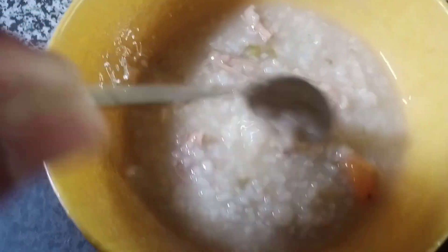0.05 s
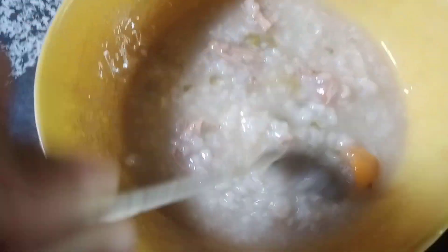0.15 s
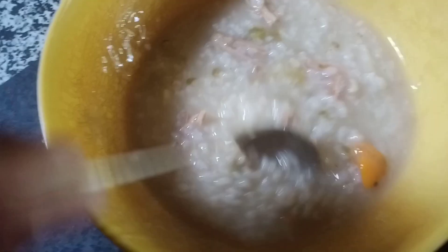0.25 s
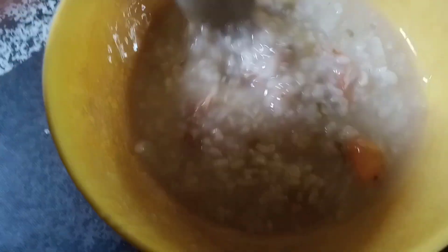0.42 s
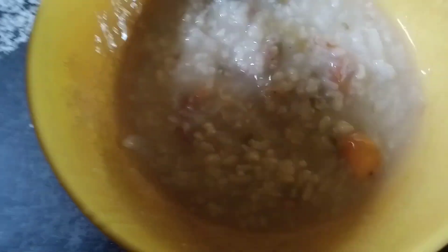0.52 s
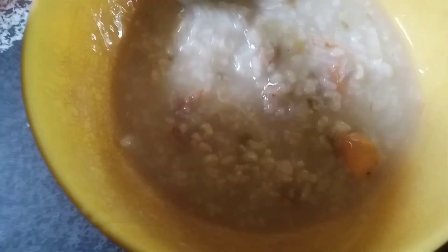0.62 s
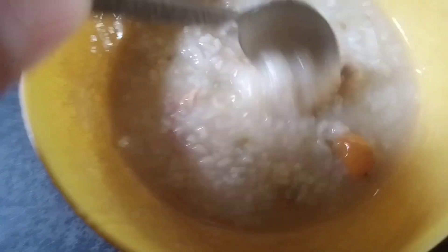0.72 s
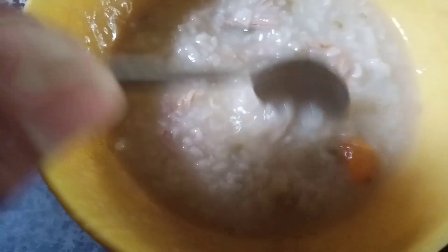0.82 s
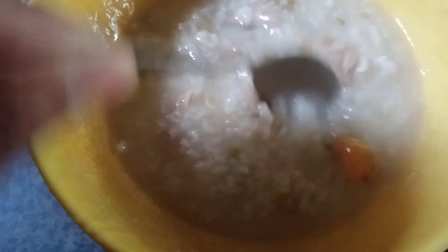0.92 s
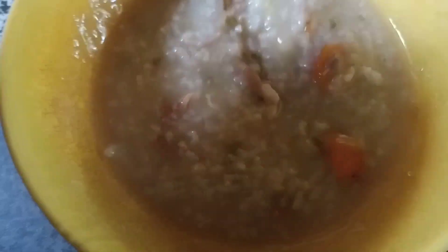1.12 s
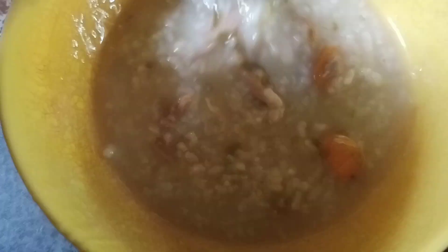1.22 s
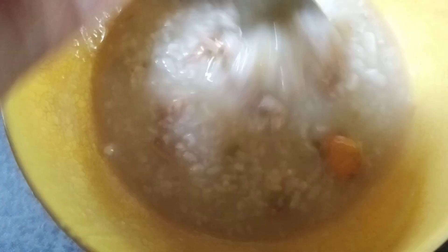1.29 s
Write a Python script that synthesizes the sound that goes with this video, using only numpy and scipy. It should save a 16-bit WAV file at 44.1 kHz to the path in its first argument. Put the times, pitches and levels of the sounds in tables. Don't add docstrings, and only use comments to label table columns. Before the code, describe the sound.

Two short, food-damped spoon knocks on a ceramic bowl about 0.7 seconds apart, each with quick bounces and a brief scrape, faint moist hisses between, steady soft fan noise, small kitchen, close phone pickup.

```python
import sys
import numpy as np
from scipy import signal
from scipy.fft import rfft, irfft
from scipy.io import wavfile
from scipy.ndimage import uniform_filter1d

SR = 44100
rng = np.random.default_rng(int(sys.argv[2]) if len(sys.argv) > 2 else 0)


def digitize_waveform(pressure):
    field = np.atleast_2d(pressure).T
    bounded = np.clip(field, -1, 1)
    quanta = np.round(bounded * 32767).astype(np.int16)
    wavfile.write(sys.argv[1], SR, quanta)


def ratio(d):
    e = np.asarray(d, float) / 20
    return 10 ** e


N = 59535


def evened(x):
    return x / np.sqrt(np.mean(x ** 2) + 1e-20)


def resonate(x, hz, width_hz):
    turn = np.exp(2j * np.pi * hz * np.arange(len(x)) / SR)
    decay = np.exp(-np.pi * width_hz / SR)
    return 2 * (turn * signal.lfilter([1 - decay], [1, -decay], x / turn)).real


def turbulence(spectrum, level_db, patchy_db, swell_db):
    frames = N // 128 + 6
    patches = uniform_filter1d(rng.standard_normal((frames, 257)), 14, 0)
    patches = evened(uniform_filter1d(patches, 5, 1)).T
    swell = evened(uniform_filter1d(rng.standard_normal(frames), 10))
    corner_hz, corner_db = np.transpose(spectrum)
    hz = np.fft.rfftfreq(N, 1 / SR)
    gain = ratio(np.interp(np.log(hz + 1), np.log(corner_hz + 1), corner_db, -99, -99))
    noise = irfft(rfft(rng.standard_normal(N)) * gain, N)
    z = signal.stft(noise, nperseg=512, noverlap=384)[2]
    z = z * ratio(patchy_db * patches + swell_db * swell)[:, :z.shape[1]]
    return ratio(level_db) * evened(signal.istft(z, nperseg=512, noverlap=384)[1][:N])


# (frequency [Hz], spectral density [dB per Hz])
RUMBLE_SPECTRUM = [(15, -52), (25, -18), (102, -6), (161, -5), (178, -9.5), (217, -3.5), (373, -14),
                   (401, -9.5), (750, -30), (980, -55), (1650, -120)]
AIR_SPECTRUM = [(440, -18.5), (750, -7), (1020, -3), (1670, -9), (1750, -5), (1890, -11), (2480, -2.5),
                (3660, -6.5), (4800, -18.5), (6240, -59), (10600, -120)]
HISS_SPECTRUM = [(4600, -16), (5400, -3), (7400, 0.5), (8600, -7), (9400, -18), (11500, -17), (13500, -12),
                 (15500, -17)]


def fan_air():
    rumble = turbulence(RUMBLE_SPECTRUM, -54, patchy_db=3.23, swell_db=1.07)
    air = turbulence(AIR_SPECTRUM, -54.5, patchy_db=0.54, swell_db=0.2)
    hiss = turbulence(HISS_SPECTRUM, -60, patchy_db=3.4, swell_db=0.26)
    return rumble + air + hiss


# (frequency [Hz], level [dB])
FAN_TONES = [(108, -62), (1002, -66), (1400, -70.5), (1803, -65.5), (2403, -66.5), (2503, -105),
             (3241, -66), (3531, -67), (5663, -72), (7300, -95), (10300, -85)]


def fan_whistles():
    width_hz = 10.2
    out = np.zeros(N)
    for hz, db in FAN_TONES:
        tone = resonate(rng.standard_normal(N), hz, width_hz)
        out += ratio(db) * evened(resonate(tone, hz, width_hz))
    return out


# (start [s], length [s], level [dB], centre frequency [Hz], bandwidth [Hz])
FOOD_SLIDES = [(0.069, 0.03, -54.5, 14000, 10000), (0.094, 0.08, -56, 13600, 4000),
               (.10, 0.019, -47.5, 7200, 1700), (0.13, 0.078, -63, 12300, 3700),
               (0.57, 0.02, -58, 13000, 3600), (0.59, 0.01, -47, 5700, 2800), (0.51, 0.014, -50, 3400, 610),
               (.579, 0.017, -45.5, 950, 460), (0.26, 0.12, -56.5, 6800, 2400),
               (.2195, 0.0065, -35.5, 7800, 1600), (0.927, 0.048, -57, 8200, 3000),
               (1.058, 0.0071, -65, 13000, 3000), (1.075, 0.084, -67, 12700, 3500)]


def sloshes():
    out, t = np.zeros(N), np.arange(N) / SR
    for start, length, db, hz, width_hz in FOOD_SLIDES:
        progress = np.clip((t - start) / length, 0, 1)
        grain_db = 2.5 * np.repeat(rng.standard_normal(N // 40 + 1), 40)[:N]
        fizz = rng.standard_normal(N) * ratio(grain_db)
        band = resonate(resonate(fizz, hz, width_hz), hz, width_hz)
        out += ratio(db) * np.sin(np.pi * progress ** 0.2) * evened(band)
    return out


def ringing(modes, damping, rise_ms, chatter):
    hz = np.fft.rfftfreq(4096, 1 / SR)
    power = sum(ratio(db) ** 2 / (1 + (2 * (hz - f) / (w * damping)) ** 2) ** 2 for f, w, db in modes)
    log_gain = .5 * np.log(power)
    phase = -signal.hilbert(np.r_[log_gain, log_gain[-2:0:-1]]).imag[:len(hz)]
    phase = phase - 4 * np.pi * rise_ms * 1e-3 * np.sqrt(3000 * hz)
    chatter_ms = 0.554
    lag = 2 * np.pi * hz * chatter_ms / 1000
    phase = phase - lag + chatter * np.sin(lag)
    ring = irfft(np.exp(log_gain + 1j * phase), 4096)[:3000]
    return ring / np.abs(ring).max()


def push(t, ms):
    width_s = ms * 2.5e-4
    return np.exp(-.5 * (t / width_s) ** 2) / (np.sqrt(2 * np.pi) * width_s * SR)


def strike_and_drag(taps, drag, modes, rise_ms, chatter):
    slips_per_s, slip_spread_db, slip_ms = 4000, 3.0, .07
    t = np.arange(N) / SR
    blow, *light = [ratio(db) * push(t - s, max(ms, .03)) for s, db, ms in taps]
    slipping = rng.random(N) < slips_per_s / SR
    slip_db = slip_spread_db * np.minimum(rng.exponential(1, N), 4)
    slips = evened(slipping * ratio(slip_db) * rng.choice([-1., 1.], N))
    slips = np.convolve(slips, push(np.arange(-30, 31) / SR, slip_ms), "same")
    at, pressure_db = np.transpose(drag)
    friction = slips * ratio(np.interp(t, at, pressure_db) - 17.5)
    struck = signal.oaconvolve(blow, ringing(modes, 0.84, rise_ms, chatter))
    bounced = signal.oaconvolve(sum(light), ringing(modes, 1.24, rise_ms, 0))
    dragged = signal.oaconvolve(friction, ringing(modes, 3.0, 0.15, 0))
    return (struck + bounced + dragged)[:N]


# (frequency [Hz], width [Hz], level [dB])
SLIDE_MODES = [(610, 108, -3), (900, 120, -4.5), (1530, 220, -6), (1950, 880, -7.5), (2917, 150, 7),
               (3870, 480, -13), (5350, 340, -7), (6050, 370, -33), (7100, 370, -21), (7640, 370, -15)]
# (time [s], force [dB], contact time [ms])
SLIDE_CONTACTS = [
    (.1010, -41.5, 0.044),
    (.1098, -61, .04),
    (.2810, -29, 0.097),
    (.2970, -30, .1),
    (.3003, -25, 0.051),
    (.3102, -35, 0.028),
    (.5806, -35.5, 0.044),
    (.5915, -41, .05),
    (.9642, -31.5, 0.38),
]
# (time [s], pressure [dB])
SLIDE_PRESSURE = [(.262, -73), (.273, -35), (.289, -47), (.298, -31), (.315, -48), (.33, -101)]


def spoon_slides():
    return strike_and_drag(SLIDE_CONTACTS, SLIDE_PRESSURE, SLIDE_MODES, rise_ms=.3, chatter=0)


def echoes(x):
    level_db, t60_s, dull_hz = -32, 0.19, 4760
    taps, at = np.zeros(8000), np.arange(100, 7960, 30)
    taps[at + rng.integers(0, 30, len(at))] = rng.choice([-1., 1.], len(at))
    taps *= ratio(-60 * np.arange(8000) / SR / t60_s)
    taps = signal.lfilter(*signal.butter(1, dull_hz, fs=SR), taps)
    return ratio(level_db) * signal.oaconvolve(x, taps / np.linalg.norm(taps))[:N]


# (time [s], level [dB], length [ms])
GLAZE_TICKS = [
    (.2148, -24.5, 0.47),
    (.9136, -28, 2),
    (.5815, -65, .8),
    (0.15, -57, 1.2),
]


def ticks():
    t = np.arange(N) / SR
    shape = sum(ratio(db) * np.exp(-.5 * ((t - s) * 2900.0 / ms) ** 2) for s, db, ms in GLAZE_TICKS)
    band = signal.butter(3, [8300, 15100], "band", fs=SR, output="sos")
    return shape * signal.sosfilt(band, rng.standard_normal(N))


# (time [s], frequency [Hz], level [dB], T60 [s])
TABLE_THUDS = [
    (0.2126, 210, -26.5, 0.061),
    (.2145, 557, -22, 0.026),
]


def thuds():
    out = np.zeros(N)
    for start, hz, db, t60 in TABLE_THUDS:
        t = np.maximum(np.arange(N) / SR - start, 0)
        onset = 1 - np.exp(-t / 0.00068)
        out += ratio(db - 60 * t / t60) * onset * np.sin(2 * np.pi * hz * t)
    return out


CHATTER_DEPTH = 0.87

# (frequency [Hz], width [Hz], level [dB])
WALL_MODES = [(860, 290, -15.5), (1290, 125, -5), (1500, 600, -5.5), (1814, 357, 0), (2050, 100, -7.5),
              (2763, 513, -0.5), (3610, 180, -10), (3925, 255, -8.5), (4510, 400, -11), (5120, 340, -19),
              (6040, 370, -21), (6780, 330, -28), (8000, 720, -36), (10900, 1000, -55)]
# (time [s], force [dB], contact time [ms])
WALL_CONTACTS = [
    (.2136, 1.5, 0.043),
    (.2193, -15, 0.044),
    (.2232, -36, 0.065),
    (.2320, -54, 0.23),
    (.2398, -35, 0.12),
    (.2450, -34, 0.11),
    (.2508, -32, 0.15),
]
# (time [s], pressure [dB])
WALL_PRESSURE = [(0.214, -76), (0.22, -10.5), (0.228, -28), (.255, -33.5), (0.276, -43.5), (.29, -95)]


def wall_knock():
    return strike_and_drag(WALL_CONTACTS, WALL_PRESSURE, WALL_MODES, rise_ms=.7, chatter=CHATTER_DEPTH)


# (frequency [Hz], width [Hz], level [dB])
RIM_MODES = [(559, 114, -11), (904, 140, -8), (1502, 225, -1), (2024, 430, -7.5), (2873, 380, 4.5),
             (3425, 250, -4), (3970, 315, -3), (4430, 440, -1), (5420, 270, -7), (6030, 460, -11.5),
             (6480, 360, -10.5), (7450, 970, -13.5), (8500, 670, -16), (9200, 890, -24)]
# (time [s], force [dB], contact time [ms])
RIM_CONTACTS = [
    (.9125, -1, 0.023),
    (.9226, -18.5, 0.12),
    (.9272, -35, 0.12),
    (.9460, -25.5, 0.089),
    (.9488, -18.5, 0.11),
    (.9529, -36, 0.056),
]
# (time [s], pressure [dB])
RIM_PRESSURE = [(.918, -54), (.926, -50), (.935, -31), (.945, -28), (0.954, -30.5), (.975, -69), (.99, -70)]


def rim_knock():
    return strike_and_drag(RIM_CONTACTS, RIM_PRESSURE, RIM_MODES, rise_ms=0.645, chatter=CHATTER_DEPTH)


def scene():
    bowl = spoon_slides() + ticks() + thuds() + wall_knock() + rim_knock()
    bowl = signal.sosfilt(signal.butter(2, 205, "high", fs=SR, output="sos"), bowl)
    return (fan_air() + fan_whistles() + sloshes() + bowl + echoes(bowl))[None]


def band_limit(x):
    return signal.sosfilt(signal.butter(12, 16420, fs=SR, output="sos"), x)


def record(dry):
    top = signal.firwin(127, 15900, fs=SR)[None]
    mix = np.clip(signal.oaconvolve(dry, top, "same"), -1, 1)
    return band_limit(mix)


dry = scene()
out = record(dry)
digitize_waveform(out)
```